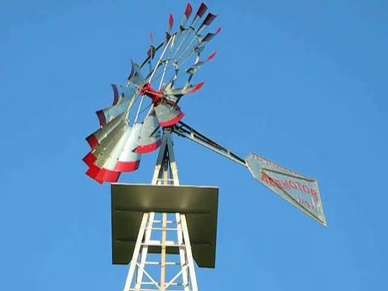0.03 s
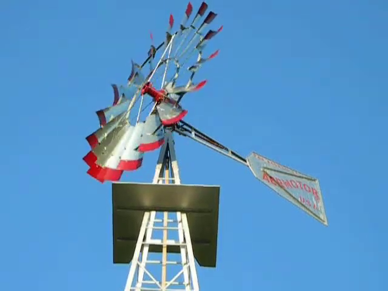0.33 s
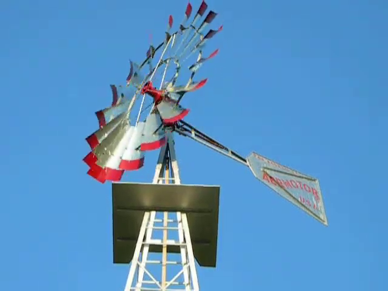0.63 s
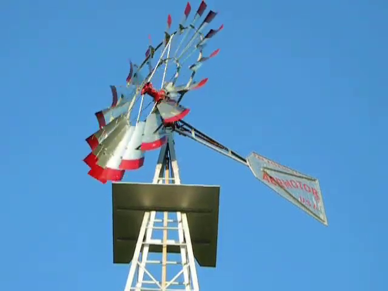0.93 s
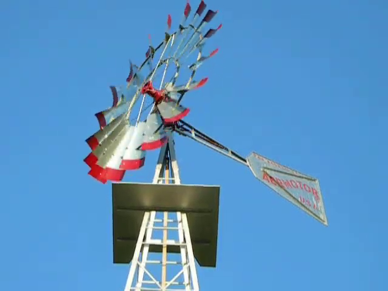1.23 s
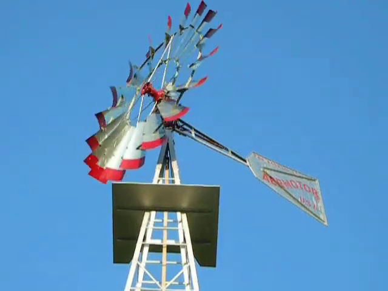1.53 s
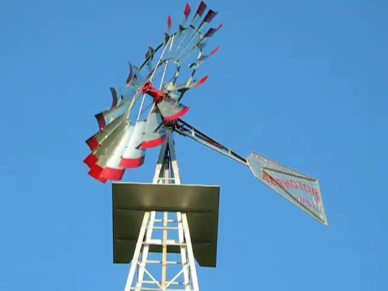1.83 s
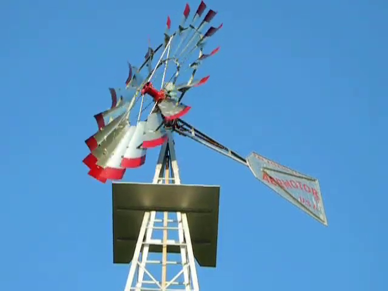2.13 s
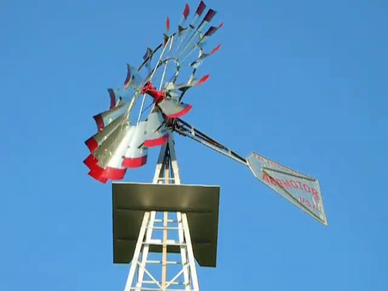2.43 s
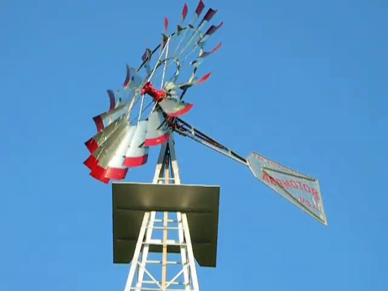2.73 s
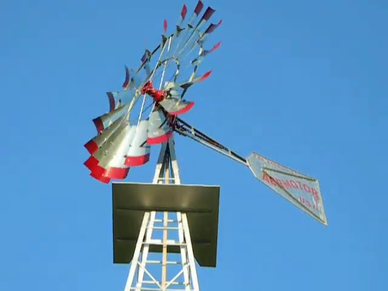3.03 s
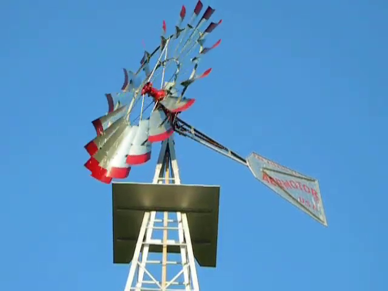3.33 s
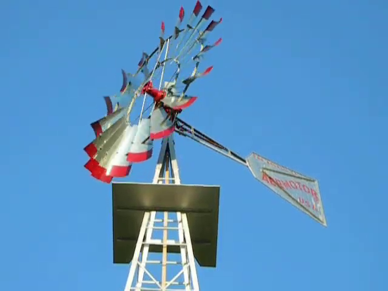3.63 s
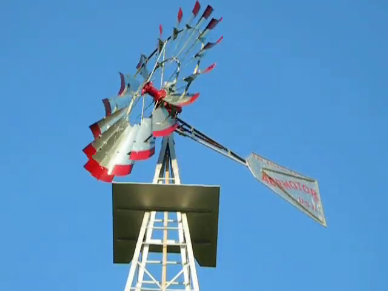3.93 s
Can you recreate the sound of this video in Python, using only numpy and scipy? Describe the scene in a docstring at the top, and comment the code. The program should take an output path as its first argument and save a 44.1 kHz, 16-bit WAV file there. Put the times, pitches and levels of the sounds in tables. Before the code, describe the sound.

A steady rush of wind blows around an outdoor windmill. A sharp click and a quick plastic knock on the hand-held microphone come first, then a fluttering hiss swells and eases among faint whistles and light buffeting.

```python
"""Wind rushes through the wheel and lattice tower of a farm windmill: broad turbulent noise.
One gust hisses in the blades; vortices shed from rods and struts give faint wavering whistles.
A small hand-held camera with a narrow sound band starts with an electric pop. Its case is knocked
and ticks twice, and eddies puff and rumble softly on its microphone."""
import sys
import numpy as np
from scipy import signal
from scipy.io import wavfile

SR = 44100
rng = np.random.default_rng(int(sys.argv[2]) if len(sys.argv) > 2 else 0)


def persist_wave(psi):
    """Save psi, clipped to +-1, as 16-bit WAV."""
    counts = np.round(np.clip(psi, -1, 1) * 32767).astype(np.int16)
    wavfile.write(sys.argv[1], SR, np.atleast_2d(counts).T)


N = 176400
TIME_S = np.arange(N) / SR

# case knocks: start_s, level_db, contact_s
CASE_KNOCKS = [(0.2361,1,0.0008),(0.2854,-17,0.00083),(0.2975,-15,0.0018)]
# low case modes: freq_hz, level_db, t60_s
CASE_MODES = [(166.5,-19.5,.1),(290,-12,.018),(386,-11,0.021),(540,-14.5,0.02),(990,-17,.012)]
# plastic ticks: start_s, level_db, pitch_ratio
PLASTIC_TICKS = [(0.236,-14,.97),(0.239,-28,1.0),(.2873,-15.5,1.03),(.2884,-26,1.02),(.2897,-24,1.03),(0.3075,-19,.92),(.3079,-27.5,.52)]
# plastic modes at pitch_ratio 1: freq_hz, level_db, t60_s
PLASTIC_MODES = [(1390,-17,.006),(2680,-8,0.01),(2990,-10.5,0.01),(3660,-3,0.0046)]
# microphone rumble envelope: time_s, level_db
RUMBLE_ENVELOPE = [(0,-44),(.48,-45.5),(.78,-47.5),(.9,-42),(1.01,-44),(1.1,-48.5),(1.5,-47.5),(1.9,-51.5),(2.35,-50),(2.8,-51),(3.15,-51.5),(3.68,-52.5),(3.8,-46),(4,-50)]
# rumble spectrum: freq_hz, relative_density_db
RUMBLE_SPECTRUM = [(25,-29.5),(50,-11),(90,0),(160,-3.5),(230,-7),(330,-23.5),(800,-38)]
# single eddies: peak_s, sigma_s, centre_hz, width_octaves, level_db
EDDY_PUFFS = [(0.894,0.039,85,1.04,-46.5),(1.006,0.0085,1100,1.6,-34.5),(1.472,0.02,90,1.7,-47),(2.95,0.033,420,1.6,-41.5),(3.033,0.035,997,1.1,-40.5),(3.048,0.055,3300,0.45,-47),(3.754,0.018,378,0.46,-43.5)]
# rod and strut tones: pitch_hz, width_hz, level_db, peak_s, sigma_s
ROD_WHISTLES = [(455.4,11,-57.5,2.5,2.6),(510.5,10,-48,1.6,2.8),(913,20,-49.5,1.2,3.8),(908,8.1,-46,2.5,0.66),(1040,9,-46.5,1.1,.45),(1030,14,-51,2.7,1.3),(1375,8.4,-50.5,1.9,0.39),(2110,15,-44.5,2,.4),(703,10,-48.5,3.8,.1),(915,9.5,-48.5,3.87,0.13)]
# gust envelope: time_s, level_db
GUST_ENVELOPE = [(0,-60),(.7,-52),(1.15,-44),(1.36,-45.5),(1.72,-37),(2.1,-42),(2.4,-41.5),(2.8,-51),(3.05,-41.5),(3.4,-48),(4,-52)]
# gust spectrum: freq_hz, relative_density_db
GUST_SPECTRUM = [(500,-32.5),(1300,-8.5),(1850,-12),(2150,3),(2450,0),(2900,-14),(3400,-11),(4200,-31.5)]
# rush envelope, before RUSH_GAIN_DB: time_s, level_db
RUSH_ENVELOPE = [(.1,-39),(.4,-38.5),(.7,-38),(1.22,-38),(1.36,-38.5),(1.55,-38.5),(1.82,-37.5),(2.3,-37.5),(2.8,-38.5),(3.05,-38.5),(3.4,-39.5),(3.68,-39),(3.95,-37.5)]
# rush spectrum: freq_hz, relative_density_db
RUSH_SPECTRUM = [(60,-21),(200,-8.5),(300,-12),(420,-5.5),(600,-1.5),(900,2),(1200,0),(1750,-1),(2100,2),(2500,-4.5),(2950,-9),(3350,-8),(3850,-22),(4300,-14)]

RUSH_GAIN_DB = 1.5


def from_db(db):
    """Decibels to gain."""
    return 10 ** (np.asarray(db) / 20)


def unit_rms(x):
    """Scale to rms 1."""
    return x / np.sqrt(np.mean(x ** 2) + 1e-20)


def envelope(rows):
    """Gain per sample from time_s, level_db rows."""
    return from_db(np.interp(TIME_S, *np.transpose(rows)))


def half_sine(start_s, length_s):
    """Half-sine pulse, height 1."""
    return np.sin(np.pi * np.clip((TIME_S - start_s) / length_s, 0, 1))


def swell(peak_s, sigma_s):
    """Gaussian rise and fall, height 1."""
    return np.exp(-.5 * ((TIME_S - peak_s) / sigma_s) ** 2)


def drift(rate_hz):
    """Random wander below about rate_hz, rms 1."""
    hop, settle_steps = 40, 2000
    pole = np.exp(-2 * np.pi * rate_hz * hop / SR)
    white = rng.standard_normal(N // hop + settle_steps + 2)
    slow = signal.lfilter([1], [1, -2 * pole, pole * pole], white)[settle_steps:]
    return np.interp(np.arange(N) / hop, np.arange(len(slow)), unit_rms(slow))


def band_noise(low_hz, high_hz):
    """Band-passed white noise."""
    bandpass = signal.butter(2, [low_hz, high_hz], "band", fs=SR, output="sos")
    return signal.sosfilt(bandpass, rng.standard_normal(N))


def turbulence(spectrum, shared_db, shared_hz, patchy_db, patchy_hz):
    """Noise bands fluttering together (shared) and singly (patchy), rms 1."""
    edges_hz = np.r_[np.geomspace(22, 700, 13)[:-1], np.geomspace(700, 4800, 15)]
    freq_hz, density_db = np.transpose(spectrum)
    out = 0
    for low_hz, high_hz in zip(edges_hz, edges_hz[1:]):
        band_db = np.interp(np.log(low_hz * high_hz) / 2, np.log(freq_hz), density_db)
        out += from_db(band_db + patchy_db * drift(patchy_hz)) * band_noise(low_hz, high_hz)
    return unit_rms(out * from_db(shared_db * drift(shared_hz)))


def ring(force, modes):
    """Damped modes driven by a force."""
    out = 0
    for freq_hz, level_db, t60_s in modes:
        radius = np.exp(-np.log(1000) / (t60_s * SR))
        step_rad = 2 * np.pi * freq_hz / SR
        feedback = [1, -2 * radius * np.cos(step_rad), radius * radius]
        out += from_db(level_db) * signal.lfilter([0, np.sin(step_rad)], feedback, force + 1e-18)
    return out


def switch_on_pop(start_s=.07254, hold_s=.00054, hold_db=-3.1, rebound_s=.00036, rebound_db=-5):
    """The input jumps to its limit, holds, then swings back past rest."""
    release_s = start_s + hold_s
    release_rad = np.pi * np.clip((TIME_S - release_s) / rebound_s, 0, .5)
    held = (TIME_S >= start_s) * np.cos(release_rad) ** 2
    return from_db(rebound_db) * half_sine(release_s, rebound_s) ** 2 - from_db(hold_db) * held


def case_knocks(low_cut_hz=130):
    """Soft contacts thump the camera case, too small to give much bass."""
    force = sum(from_db(level_db) * half_sine(start_s, contact_s) * np.pi / (2 * contact_s * SR)
                for start_s, level_db, contact_s in CASE_KNOCKS)
    highpass = signal.butter(2, low_cut_hz, "high", fs=SR, output="sos")
    return signal.sosfilt(highpass, ring(force, CASE_MODES))


def plastic_ticks():
    """Hard contacts ring the plastic for a few milliseconds."""
    out = 0
    for start_s, level_db, pitch_ratio in PLASTIC_TICKS:
        impulse = signal.unit_impulse(N, int(start_s * SR))
        out += from_db(level_db) * ring(impulse, np.array(PLASTIC_MODES) * [pitch_ratio, 1, 1])
    return out


def microphone_rumble():
    """Eddies buffet the microphone."""
    noise = turbulence(RUMBLE_SPECTRUM, shared_db=.5, shared_hz=21, patchy_db=1.9, patchy_hz=43)
    return envelope(RUMBLE_ENVELOPE) * noise


def eddy_puffs():
    """Single eddies give brief swells of noise."""
    out = 0
    for peak_s, sigma_s, centre_hz, width_octaves, level_db in EDDY_PUFFS:
        edge_ratio = 2 ** (width_octaves / 2)
        noise = unit_rms(band_noise(centre_hz / edge_ratio, centre_hz * edge_ratio))
        out += from_db(level_db) * swell(peak_s, sigma_s) * noise
    return out


def rod_whistles(pitch_waver=.002, waver_hz=2.2, steady_share=.37):
    """Rods shed vortices: narrow, unsteady tones wavering together with wind speed."""
    speed_ratio = 1 + pitch_waver * drift(waver_hz)
    out = 0
    for pitch_hz, width_hz, level_db, peak_s, sigma_s in ROD_WHISTLES:
        phase_rad = 2 * np.pi * np.cumsum(pitch_hz * speed_ratio) / SR
        noise = unit_rms(drift(width_hz) * np.cos(phase_rad) + drift(width_hz) * np.sin(phase_rad))
        tone = np.sqrt(2 * steady_share) * np.sin(phase_rad) + np.sqrt(1 - steady_share) * noise
        out += from_db(level_db) * swell(peak_s, sigma_s) * tone
    return out


def blade_gust():
    """A gust hisses through the blades, fluttering fast."""
    noise = turbulence(GUST_SPECTRUM, shared_db=2.7, shared_hz=29, patchy_db=2.04, patchy_hz=13)
    return envelope(GUST_ENVELOPE) * noise


def wind_rush():
    """Broad, near-steady turbulence in the wheel and tower."""
    noise = turbulence(RUSH_SPECTRUM, shared_db=.1, shared_hz=10, patchy_db=.77, patchy_hz=4.7)
    return from_db(RUSH_GAIN_DB) * envelope(RUSH_ENVELOPE) * noise


def scene():
    """Wind and case noise at the microphone, mono."""
    wind = wind_rush() + blade_gust() + microphone_rumble() + eddy_puffs() + rod_whistles()
    return (wind + case_knocks() + plastic_ticks())[None]


def record(dry):
    """A biased, narrow-band input opens just after the pop; a final low-pass acts on both."""
    open_s, dc_bias = .0755, -.012
    input_stop_hz, cutoff_hz = 4792, 16300
    input_lowpass = signal.cheby2(14, 75, input_stop_hz, fs=SR, output="sos")
    output_lowpass = signal.ellip(10, .1, 80, cutoff_hz, fs=SR, output="sos")
    narrow = signal.sosfilt(input_lowpass, (dry + dc_bias) * (TIME_S > open_s))
    return signal.sosfilt(output_lowpass, narrow + switch_on_pop())


dry = scene()
out = record(dry)
persist_wave(out)
```